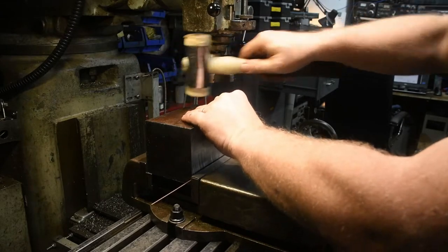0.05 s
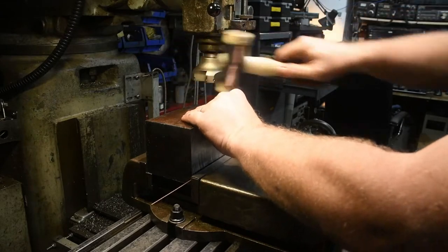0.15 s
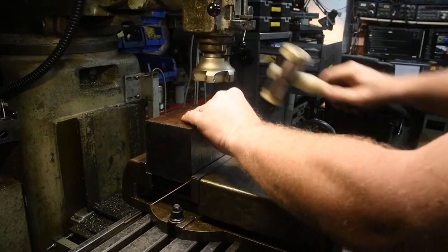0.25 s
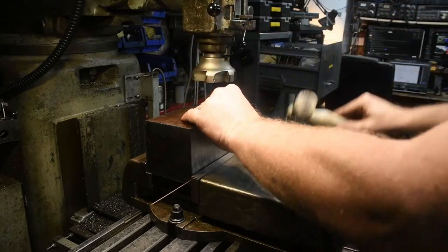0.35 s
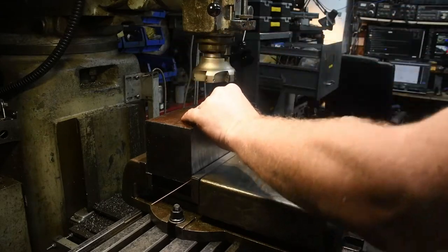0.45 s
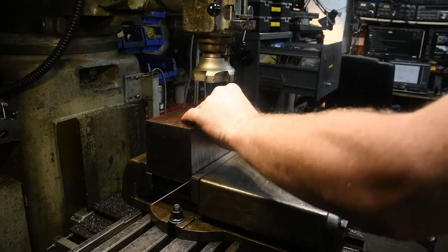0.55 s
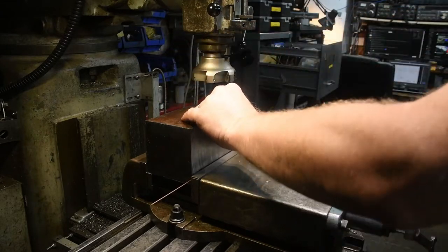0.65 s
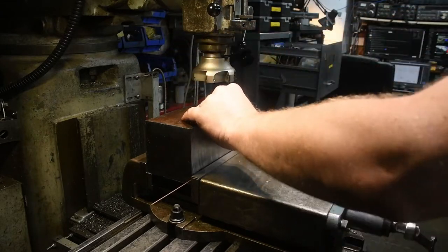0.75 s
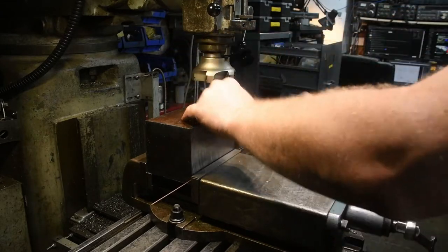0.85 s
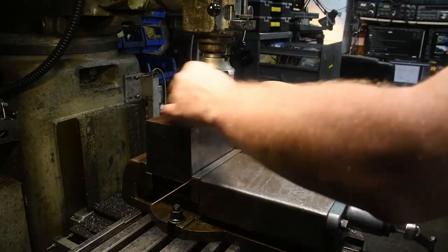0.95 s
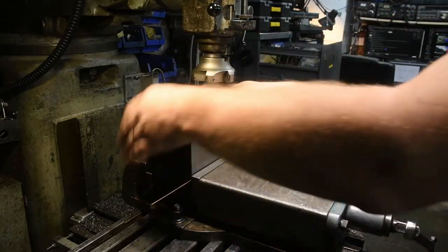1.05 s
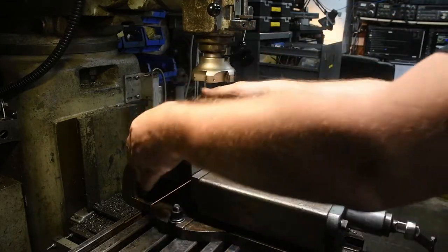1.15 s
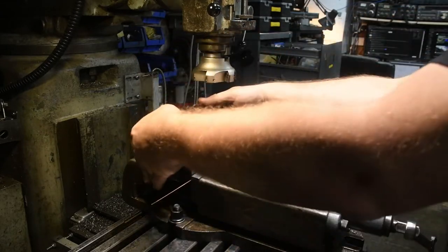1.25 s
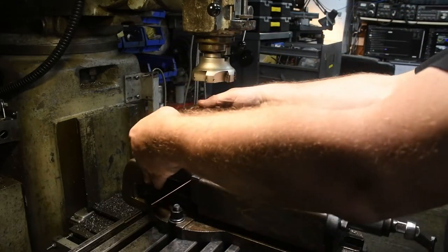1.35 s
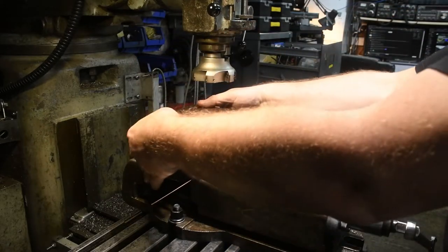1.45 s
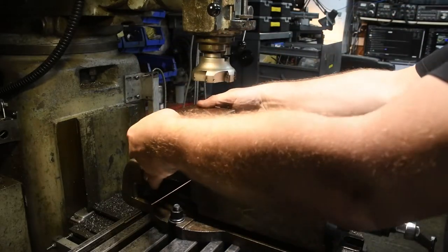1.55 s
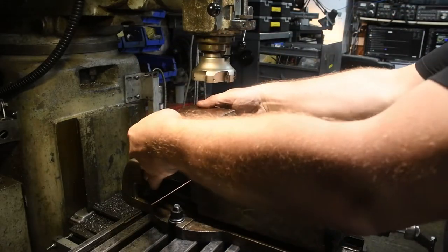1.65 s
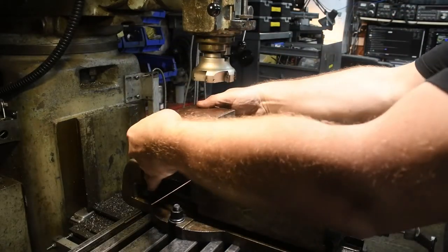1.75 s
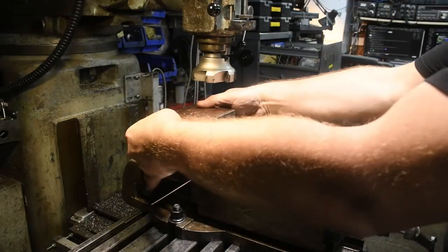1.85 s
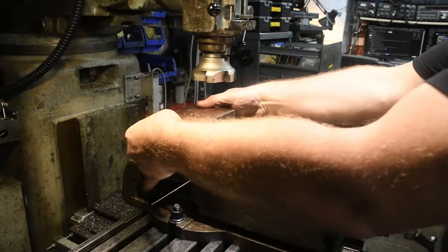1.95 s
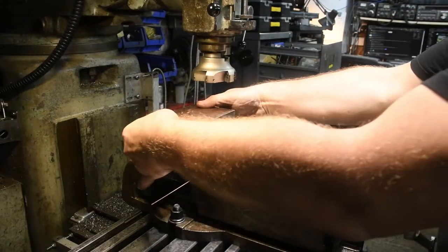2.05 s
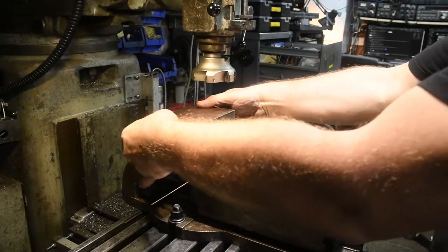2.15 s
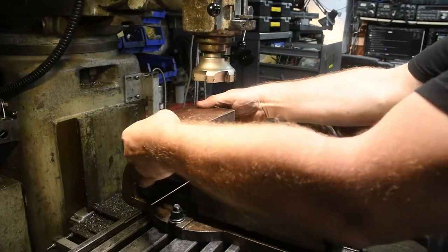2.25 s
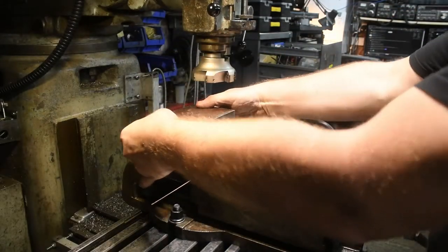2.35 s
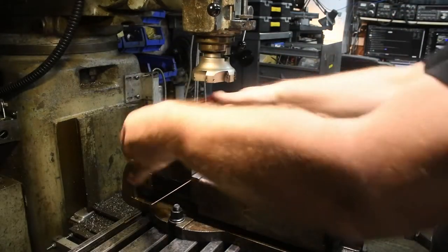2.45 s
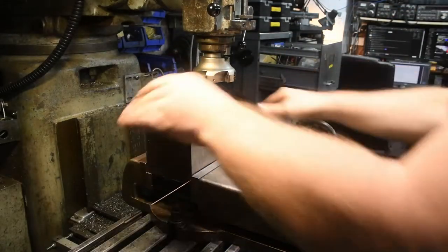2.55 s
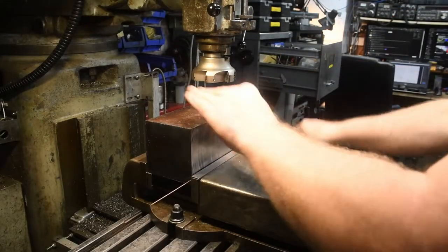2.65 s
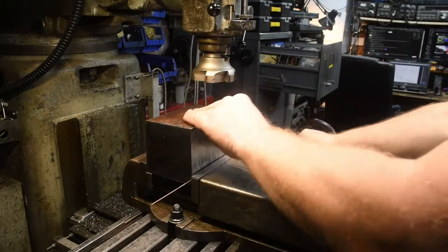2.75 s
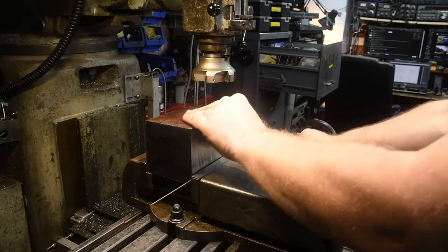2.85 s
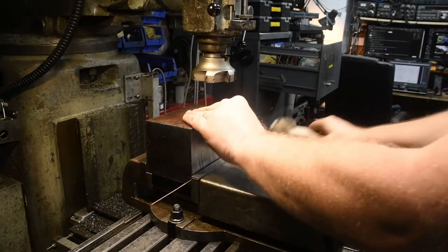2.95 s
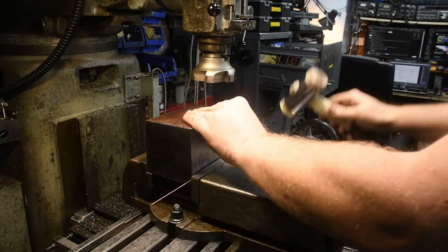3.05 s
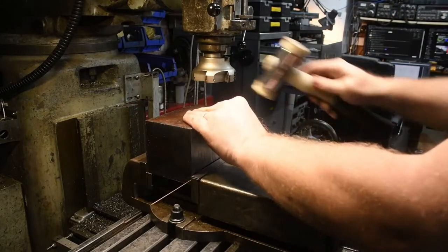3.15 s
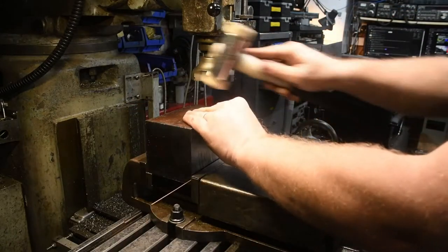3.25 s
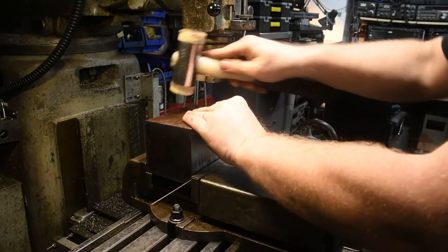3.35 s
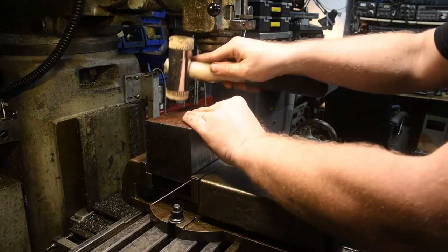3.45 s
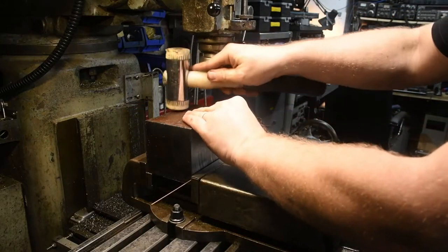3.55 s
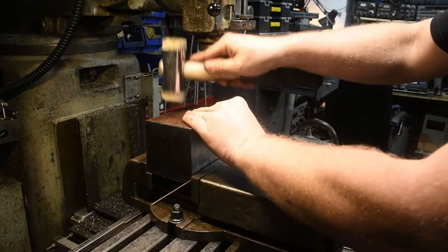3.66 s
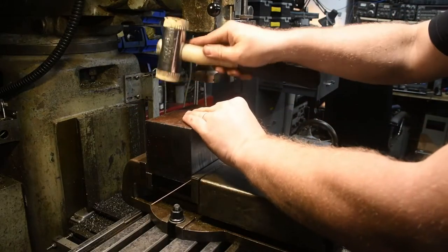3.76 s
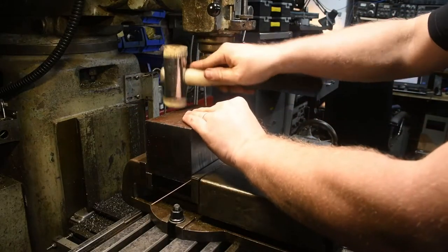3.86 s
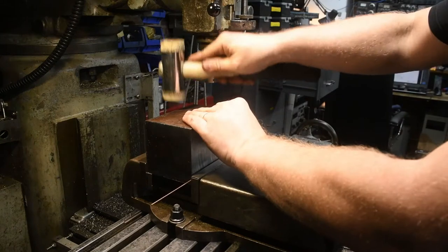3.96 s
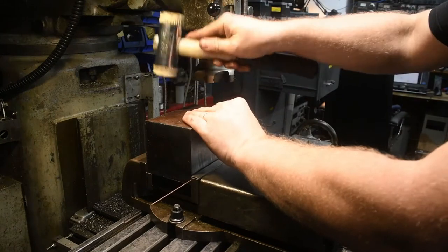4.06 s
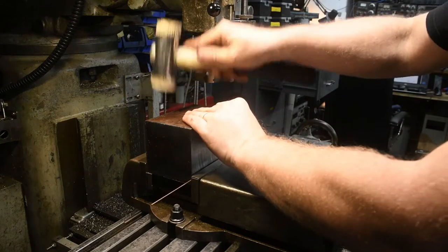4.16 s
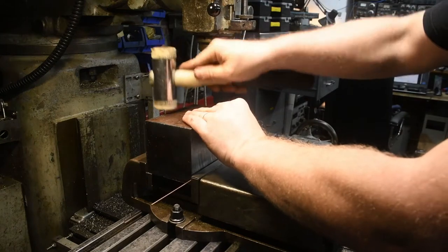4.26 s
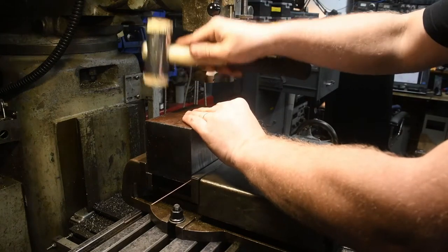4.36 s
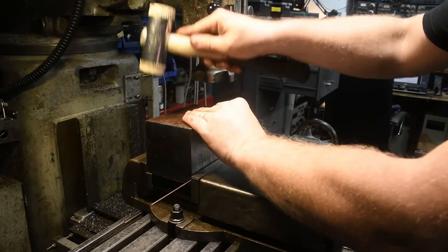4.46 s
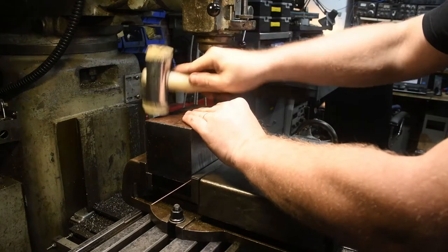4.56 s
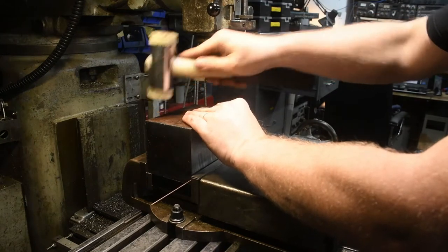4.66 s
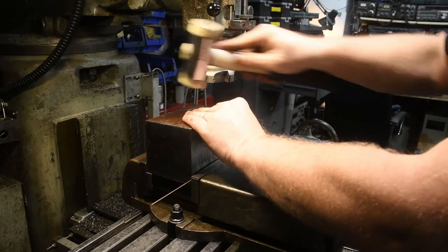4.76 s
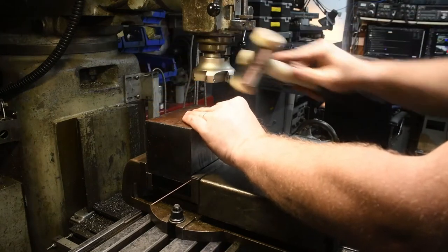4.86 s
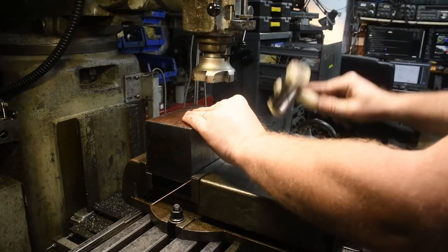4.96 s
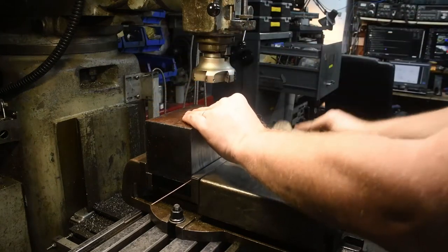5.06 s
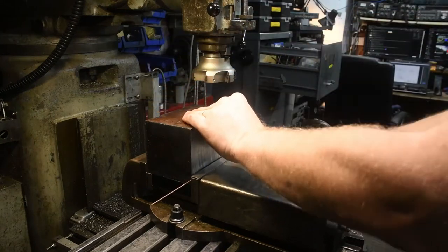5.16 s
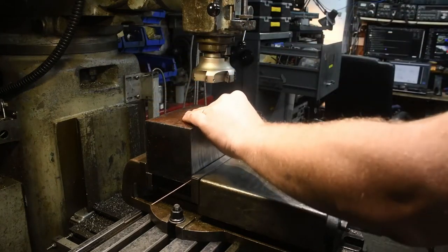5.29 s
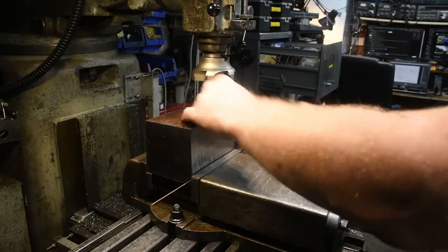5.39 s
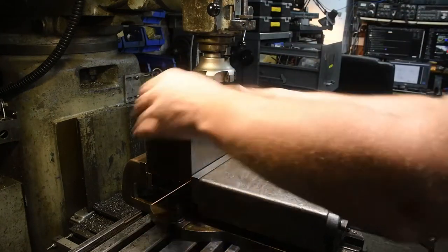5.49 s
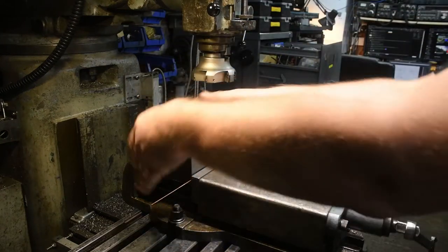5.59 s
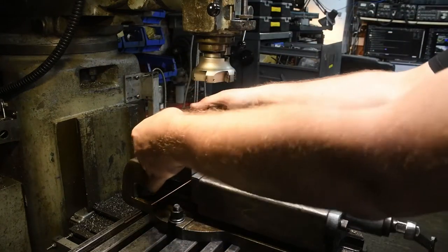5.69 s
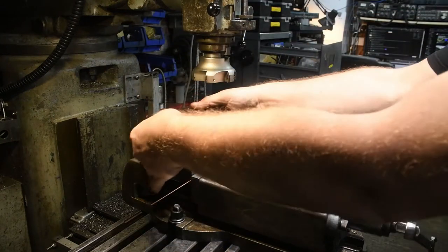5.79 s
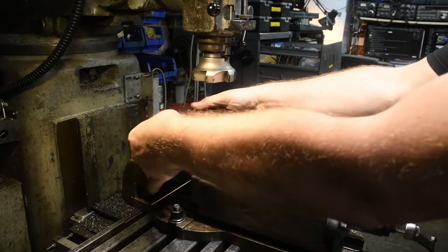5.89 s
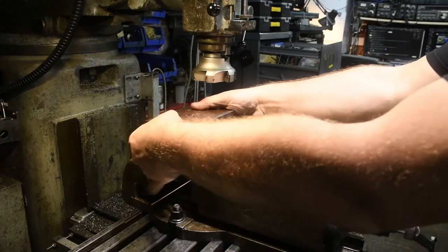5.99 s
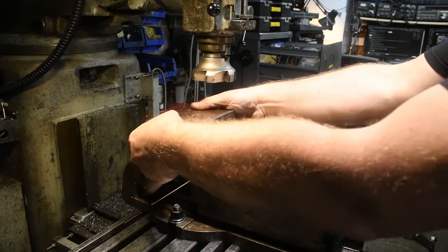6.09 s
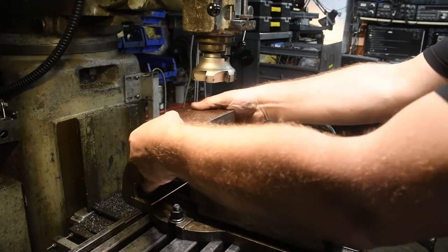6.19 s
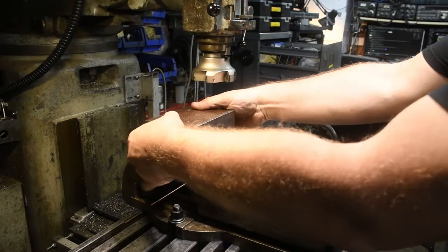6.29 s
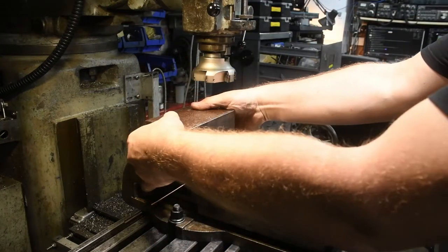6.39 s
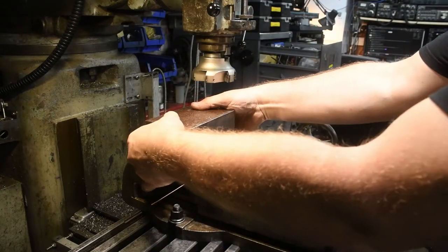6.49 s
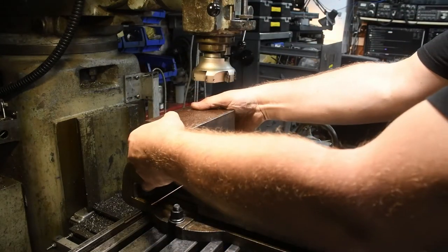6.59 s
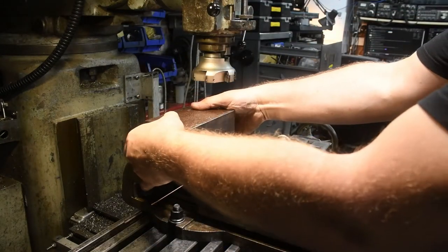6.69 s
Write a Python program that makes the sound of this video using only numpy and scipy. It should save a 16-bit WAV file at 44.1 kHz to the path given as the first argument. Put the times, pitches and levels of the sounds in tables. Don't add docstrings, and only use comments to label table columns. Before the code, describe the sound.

Close stereo view of a heavy vise being tapped: fading metallic ring, dull bench knocks and a rattle of rocking steel, then quiet skin rubbing with one tiny squeak. A light tap leads to three strong, evenly spaced mallet cracks, the last brightest, each ringing briefly in the room. Bench knocks and ringing clanks return, then faint handling over a low fan hum.

```python
import sys
import numpy as np
from scipy import signal
from scipy.io import wavfile
from scipy.ndimage import uniform_filter1d, minimum_filter1d

SR = 44100
rng = np.random.default_rng(int(sys.argv[2]) if len(sys.argv) > 2 else 0)


def bounce(signal):
    frames = np.transpose(np.atleast_2d(signal))
    limited = np.clip(frames, -1, 1)
    pcm = np.round(limited * 32767).astype(np.int16)
    wavfile.write(sys.argv[1], SR, pcm)


def how_loud(loudness_db):
    steps = np.asarray(loudness_db, float) / 20
    return 10 ** steps


N = 296793
LEAD = int(.3 * SR)
TAIL = np.arange(int(.6 * SR)) / SR

# t/s, peak level/dB, thud/dB, bite/dB, ping/dB
BLOWS = [
    (-.16, 10, -12.5, -2, -25),
    (3.5594, -26.5, 11, -5, -7),
    (3.850, -4, -2.5, 4, 6.5),
    (4.216, -5, -0.5, 1.5, 5),
    (4.550, 1.5, -6, 2, 17.5),
]
# t/s, peak level/dB, thud/dB, bite/dB, ping/dB
KNOCKS = [
    (.520, -38.5, 5.5, -19, 0),
    (.623, -38.5, 1.5, 1, 4),
    (5.152, -24.5, -28, 2, -39),
    (5.178, -29.5, -11, 3.5, 9),
    (5.195, -33.5, -4, -29, -7),
    (5.251, -43, 5, 7.5, 19),
    (5.547, -44, -5.5, -12, -8),
]
# t/s, peak level/dB, thud/dB, bite/dB
FIRST_CLANKS = [
    (0.75, -24, -6, 0),
    (0.758, -20, -20, -20),
    (0.765, -30, 7, -4),
    (0.83, -25, -20, -2),
    (.836, -24.5, -5, -29),
    (0.844, -25.5, -12, -21),
    (0.874, -33.5, 7, -5),
    (0.893, -33.5, 0, -38),
]
# t/s, peak level/dB, thud/dB, bite/dB
SECOND_CLANKS = [
    (5.332, -17.5, -13, 2),
    (5.3460, -21, -6, 2),
    (5.428, -25, 1, 0),
    (5.524, -41, -8, 0),
]
# t/s, peak level/dB, thud/dB, bite/dB, ping/dB
TICKS = [
    (1.067, -69, 0, 1, -10),
    (2.417, -68, 0, -15, 0),
    (3.762, -64, 7, -1, -4.5),
    (4.4168, -45, -4.5, 0, 0),
    (4.547, -40.5, -3, -9, 6),
]
# t/s, block level/dB, jaw level/dB
LONG_RINGS = [
    (-.16, -39, -29),
    (3.558, -38.5, -58),
    (3.850, -25.5, -37),
    (4.217, -27, -37.5),
    (4.551, -24.5, -31.5),
]
# peak t/s, level/dB, fade/s, dullness/dB
GRIPS = [(.03, -73.5, 0.44, 20.5), (.526, -58.5, 0.029, 8), (.626, -64, 0.1, -3), (1.154, -62.5, .08, -4),
         (1.76, -72.5, 0.12, 12.5), (2.51, -52.5, 0.028, -9), (2.78, -55, 0.043, -4),
         (4.76, -63, 0.08, 17.5), (5.175, -58, 0.032, 3), (5.66, -51.5, .12, -1.5),
         (5.92, -67.5, 0.11, 1.5), (6.22, -69.5, 0.12, 7), (6.46, -72, .13, -7)]
# peak t/s, level/dB, fade/s, dullness/dB
SLIDES = [(.764, -66, 0.11, 10), (0.926, -56.5, 0.11, 14), (1.262, -64, 0.061, -1), (1.57, -70, .08, 0),
          (2.06, -57.5, 0.052, -9), (2.3, -83, .1, -8), (2.42, -63, 0.064, 3), (3.05, -67.5, .3, 10.5),
          (3.15, -58.5, 0.06, 0), (3.4, -70.5, 0.59, 14), (5.051, -74, .4, 1), (5.27, -56, 0.054, 12),
          (5.428, -57.5, 0.08, 16), (6.09, -70, .07, 9)]

# f/Hz, level/dB, t60/s
VISE_AND_TABLE = [(112, -31, .7), (350, -13, .2), (383, -10, .26), (410, -12, .22), (662, -9, .18), (740, -8, .22),
                  (817, -12, .22), (918, -6, .14), (956, -10, .17), (1074, -4, .19), (1130, -10, .18),
                  (1246, -8, .12), (1310, -9, .15),
                  (1550, -10, .16), (1940, -10, .12), (2380, -12, .12), (2950, -16, .08), (3330, -14.5, .06),
         (3880, -16.5, .05), (4440, -16.5, .06), (4660, -14, .08), (5380, -16, 0.071), (5760, -15.5, 0.03),
         (6550, -18, .05)]
# f/Hz, level/dB, t60/s
BENCH = [(423, -3, .1), (547, -1, .1), (604, -11, .1), (715, -23, 0.1), (1290, -19, .05), (1530, -3, .06),
         (1790, -20, .04), (3022, -15.5, .035), (3540, -7, 0.036)]
# f/Hz, level/dB, t60/s
FIRST_STEEL = [(581, -14, .22), (759, -7, .07), (1114, -8, .07), (1335, -1, .07), (1486, -5, .08),
               (1798, -3, .09), (1863, -6, .07), (1990, -8, .08), (3000, -13, .04), (3295, -12, .08),
               (3480, -12, .05), (4043, -18, .06), (4340, -18, .05), (4700, -19, .03)]
# f/Hz, level/dB, t60/s
SECOND_STEEL = [(581, -1, .29), (612, -11, .12), (1346, -11, .1), (1490, -7, .13), (1690, -12, .11),
                (1771, -13, .1), (1943, -13, .1), (2003, -13, .12), (2148, -1, .2), (2215, -8, .1),
                (2640, -13, .05), (3295, -20, .1), (3381, -20, .07), (4600, -25, .08)]
# f/Hz, level/dB, t60/s
PIN = [(5060, 1, .07), (5250, 2, .08), (5400, 2, .09), (5550, 2, .08), (5750, 0, .07), (8100, -6, .04)]
# f/Hz, level/dB, t60/s
PARALLEL = [(8130, -5, .02), (8500, -3, .018), (8800, -1, .022), (9050, 0, .022), (9420, -2, .02),
            (9970, -5, .018)]

# f/Hz, level/dB per Hz
BLOW_COLOUR = [(18, -50), (30, -32), (200, -13), (260, -14), (390, -4), (730, 2), (1270, -6), (1500, -9),
               (3000, -16), (4800, -15.5), (8000, -24.5), (12000, -26.5), (15000, -22), (16500, -21)]
# f/Hz, level/dB per Hz
KNOCK_COLOUR = [(35, -52.5), (60, -8.5), (573, 0.5), (644, -2), (1770, -5.5), (2290, -17.5), (6600, -29.5),
                (9170, -37), (15400, -24), (16500, -43)]
# f/Hz, level/dB per Hz
CLANK_COLOUR = [(35, -43), (60, -7), (464, -14), (573, 1.5), (983, -28), (1300, 1), (2140, -1), (2900, -25),
                (5000, -24.5), (15400, -52), (16500, -59)]
# f/Hz, level/dB per Hz
TICK_COLOUR = [(300, -45), (1500, -19), (3000, 0), (5300, -0.5), (8000, -6), (16000, -1.5)]
# f/Hz, level/dB per Hz
RUB_COLOUR = [(600, -26.5), (1500, -11), (3500, -11), (7000, -12), (11000, -10.5), (15500, -1.5)]
# f/Hz, level/dB per Hz
FLOOR_COLOUR = [(20, -17.5), (45, -8.5), (70, -13.5), (200, -16.5), (330, -16.5), (500, -22.5), (750, -9),
                (950, -37), (1150, -24), (1500, -30.5), (3300, -35), (7000, -39.5), (15200, -34.5),
                (16500, -42.5)]
# f/Hz, t60/s
ROOM_T60 = [(40, .3), (120, .45), (300, 0.39), (700, .22), (1800, 0.24), (4800, 0.21), (9000, 0.15),
            (15000, 0.15)]
# f/Hz, likeness/0..1
BLOW_LIKENESS = [(60, 0.96), (180, 1), (550, 0.94), (1100, 0.9), (2200, 0.5), (4970, 0.34), (15000, 0.025)]
# f/Hz, likeness/0..1
FLOOR_LIKENESS = [(40, 0.97), (180, 0.75), (550, 0.68), (1650, 0.57), (4970, .02), (15000, .02)]
# f/Hz, level/dB rms, width/Hz
CASING = [(209.7, -67.5, 30), (415, -78.5, 6.9), (115.85, -79.5, 4.4), (298.8, -80, 34), (703, -74, 76)]

FLOOR_DB = -37.5
BLADE_HZ, BLADE_DB = 209.8, -66
GRIP_RISE_S, FADE_DB = .015, 12.5
SQUEAK_S, SQUEAK_HZ, SQUEAK_DB, SQUEAK_WIDTH_S = 2.055, 1500, -66, 0.014
BLOCK_HZ, BLOCK_T60 = 538.5, .62
JAW_HZ, JAW_T60 = 1200, .42
CONTACT_S = .0007
SPREAD_DB = 2.0
LIMIT_DB, RELEASE_DB_S = -4.2, 400


def rms_one(x):
    return x / np.sqrt(np.mean(x ** 2) + 1e-20)


def at_hz(points, hz):
    table_hz, values = np.array(points).T
    return np.interp(np.log(hz), np.log(table_hz), values)


def dying(t60):
    return how_loud(-60 * TAIL / t60)


def add(out, s, sound):
    at = round(s * SR) + LEAD
    out[..., at:at + sound.shape[-1]] += sound


def noise_bands(envelope, likeness):
    out = 0
    edges = np.r_[22.5 * 2 ** np.arange(0, 8.1, .5), 7000, 8300, 10000, 12000, 14200, 17000]
    white = rng.standard_normal((2, 2, N + LEAD))
    for k, (low, high) in enumerate(zip(edges, edges[1:])):
        hz = np.sqrt(low * high)
        band = signal.butter(2, [low, high], "band", fs=SR, output="sos")
        mid, side = signal.sosfilt(band, white[k % 2] * envelope(hz))
        alike = np.clip(at_hz(likeness, hz), 0, 1)
        out = out + np.sqrt(1 + alike) * mid + np.sqrt(1 - alike) * side * [[1], [-1]]
    return out[:, LEAD:]


def fan():
    out = how_loud(BLADE_DB) * np.sqrt(2) * np.sin(2 * np.pi * BLADE_HZ * np.arange(N) / SR)
    for hz, db, width_hz in CASING:
        radius = np.exp(-np.pi * width_hz / SR)
        angle = 2 * np.pi * hz / SR
        stage = [1, 0, -1, 1, -2 * radius * np.cos(angle), radius * radius]
        hum = signal.sosfilt([stage, stage], rng.standard_normal(N + SR))[SR:]
        out = out + how_loud(db) * rms_one(hum)
    return out


def strokes_db(time):
    s, db, fade_s, dull_db = np.transpose(GRIPS + SLIDES)[:, :, None]
    slide_rise_s = fade_s[len(GRIPS):, 0]
    rise_s = np.r_[np.full(len(GRIPS), GRIP_RISE_S), slide_rise_s][:, None]
    distance = np.maximum((s - time) / rise_s, (time - s) / fade_s)
    return db - FADE_DB * distance, dull_db


def air_and_hands():
    sample = np.arange(N + LEAD)
    coarse = sample[::64]
    rub_db, dull_db = strokes_db((coarse - LEAD) / SR)

    def envelope(hz):
        tilt_db = dull_db * np.log2(12000 / hz) / 3
        rub = how_loud(rub_db + 5.0 + at_hz(RUB_COLOUR, hz) + tilt_db)
        floor = how_loud(FLOOR_DB + at_hz(FLOOR_COLOUR, hz))
        level = np.sqrt(floor ** 2 + np.sum(rub ** 2, axis=0))
        return np.interp(sample, coarse, level)
    return noise_bands(envelope, FLOOR_LIKENESS)


def squeak():
    time = np.arange(N) / SR - SQUEAK_S
    swell = np.exp(-(time / SQUEAK_WIDTH_S) ** 2)
    return how_loud(SQUEAK_DB) * swell * np.sin(2 * np.pi * SQUEAK_HZ * time)


def strength_db(events, hz):
    levels = []
    for s, db, thud, bite, *ping in events:
        tilt = [(300, thud), (1100, 0.003), (3000, bite), (6200, bite), (8900, sum(ping)), (12000, 0)]
        levels.append(db + at_hz(tilt, hz))
    return np.array(levels)


def scatter(power, hz, events, colour, level_db, crack_db, shorten):
    shape = dying(shorten * at_hz(ROOM_T60, hz)) + how_loud(crack_db) * dying(0.025)
    levels = how_loud(strength_db(events, hz) + at_hz(colour, hz) + level_db)
    for event, level in zip(events, levels):
        add(power, event[0], (level * shape) ** 2)


def room_echoes():
    def envelope(hz):
        power = np.full(N + LEAD, 1e-16)
        scatter(power, hz, TICKS, TICK_COLOUR, level_db=-6.5, crack_db=14, shorten=0.99)
        scatter(power, hz, FIRST_CLANKS + SECOND_CLANKS, CLANK_COLOUR, level_db=-5.0, crack_db=4.5, shorten=1.0)
        scatter(power, hz, KNOCKS, KNOCK_COLOUR, level_db=4, crack_db=-5.0, shorten=1.0)
        scatter(power, hz, BLOWS, BLOW_COLOUR, level_db=3.5, crack_db=-1.0, shorten=0.92)
        return np.sqrt(power)
    return noise_bands(envelope, BLOW_LIKENESS)


def walls(x, t60, wet_db):
    mid, side = rng.standard_normal((2, len(TAIL))) * dying(t60)
    high_pass = signal.butter(1, 1500, "high", fs=SR, output="sos")
    side = signal.sosfilt(high_pass, side)
    spray = np.array([mid + side, mid - side]) / np.sqrt(np.sum(mid ** 2))
    return x + how_loud(wet_db) * signal.fftconvolve(x, spray, axes=1)[:, :x.shape[1]]


def ring(events, modes, level_db):
    out = np.zeros((2, N + LEAD))
    chance = rng.standard_normal((len(events), 2, len(modes)))
    shapes = np.array([dying(t60) * np.sin(2 * np.pi * hz * TAIL) for hz, db, t60 in modes])
    shapes = shapes * (1 - np.exp(-TAIL / CONTACT_S))
    levels_db = np.array([strength_db(events, hz) + db for hz, db, t60 in modes]).T
    signs = (-1) ** np.arange(len(modes))
    for event, db, (luck, lean) in zip(events, levels_db, chance):
        balance = 1 + .12 * lean * [[1], [-1]]
        gains = signs * how_loud(db + level_db + SPREAD_DB * luck) * balance
        add(out, event[0], gains @ shapes)
    return out


def struck_bodies():
    struck = ring(TICKS, PIN, -15.0)
    struck += ring(FIRST_CLANKS, FIRST_STEEL, -7.5)
    struck += ring(SECOND_CLANKS, SECOND_STEEL, -12.0)
    struck += ring(KNOCKS, BENCH, -8.5)
    struck += ring(BLOWS[-1:], PARALLEL, -20.5)
    struck += ring(BLOWS, VISE_AND_TABLE, -12.0)
    return walls(struck, t60=.17, wet_db=-6.0)[:, LEAD:]


def block_and_jaw():
    out = np.zeros(N + LEAD)
    block = dying(BLOCK_T60) * np.sin(2 * np.pi * BLOCK_HZ * TAIL)
    jaw = dying(JAW_T60) * np.sin(2 * np.pi * JAW_HZ * TAIL)
    for s, block_db, jaw_db in LONG_RINGS:
        add(out, s, how_loud(block_db) * block + how_loud(jaw_db) * jaw)
    return out[LEAD:]


def scene():
    quiet = fan() + air_and_hands() + squeak()
    return quiet + room_echoes() + struck_bodies() + block_and_jaw()


def roll_off(x):
    return signal.sosfilt(signal.butter(12, 17140, fs=SR, output="sos"), x)


def record(dry):
    ramp = RELEASE_DB_S * np.arange(N) / SR
    level_db = 20 * np.log10(np.abs(dry).max(axis=0) + 1e-9)
    held_db = np.maximum.accumulate(level_db + ramp) - ramp
    over_db = np.minimum(LIMIT_DB - held_db, 0)
    cut_db = uniform_filter1d(-minimum_filter1d(over_db, size=25), size=24)
    top_cut = signal.ellip(8, .5, 30, 15800, fs=SR, output="sos")
    finished = signal.sosfilt(top_cut, dry * how_loud(-cut_db))
    return roll_off(finished)


dry = scene()
out = record(dry)
bounce(out)
```